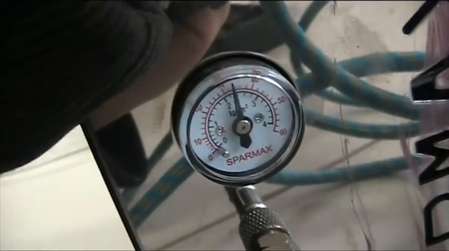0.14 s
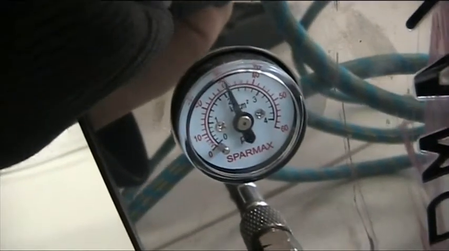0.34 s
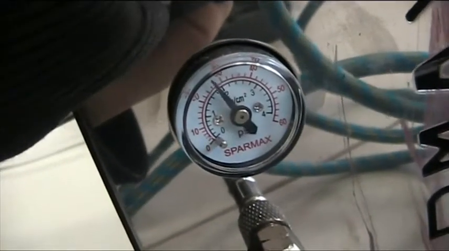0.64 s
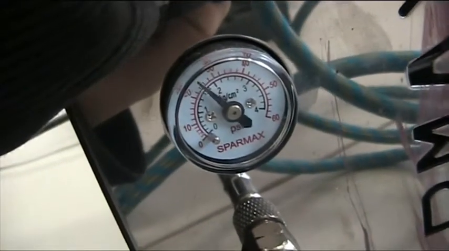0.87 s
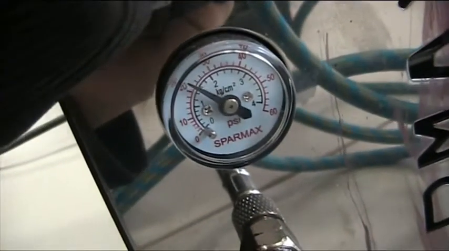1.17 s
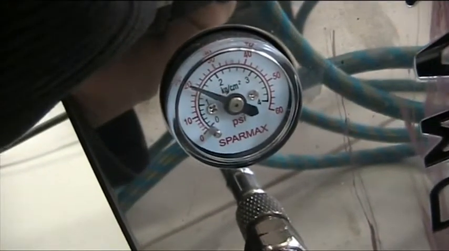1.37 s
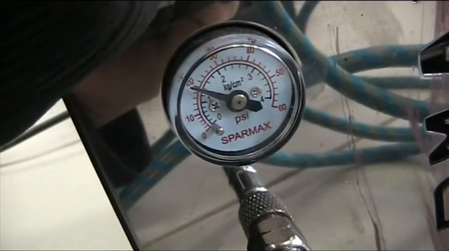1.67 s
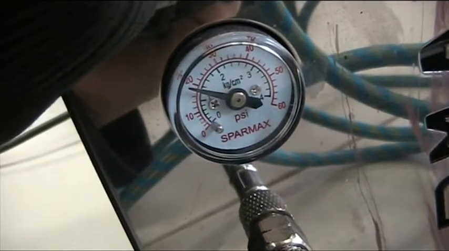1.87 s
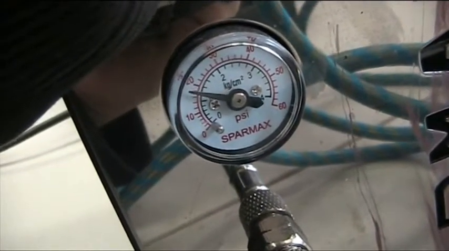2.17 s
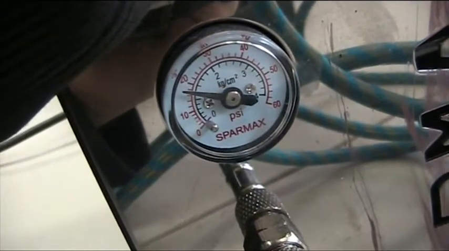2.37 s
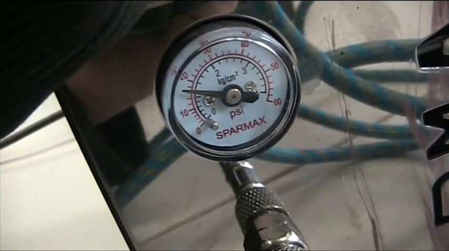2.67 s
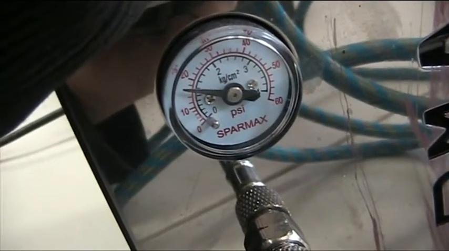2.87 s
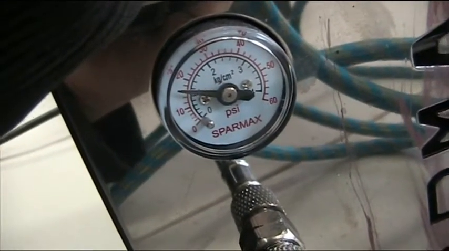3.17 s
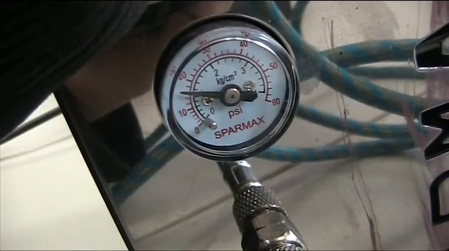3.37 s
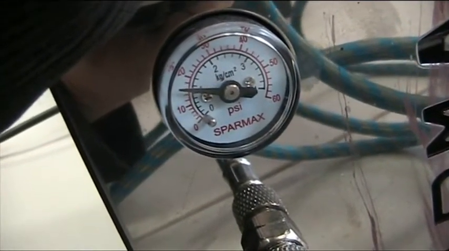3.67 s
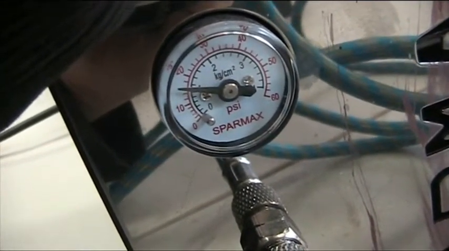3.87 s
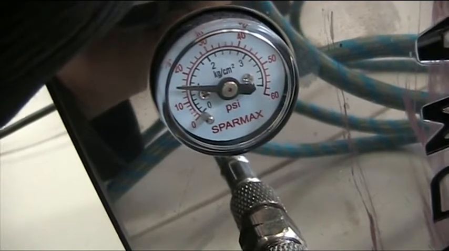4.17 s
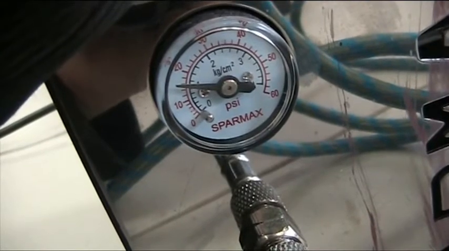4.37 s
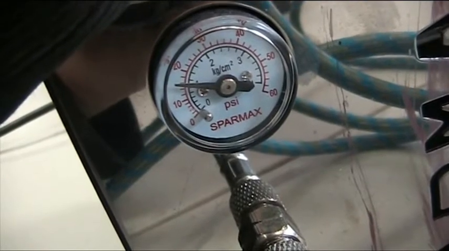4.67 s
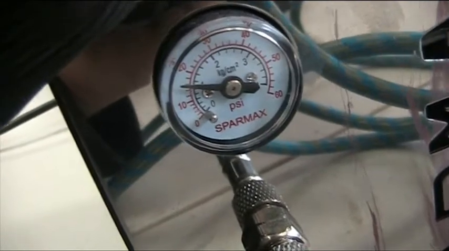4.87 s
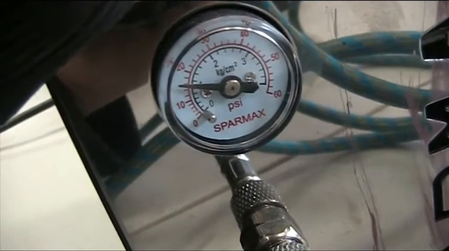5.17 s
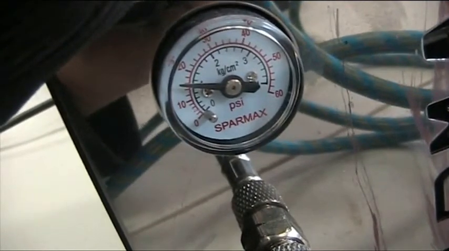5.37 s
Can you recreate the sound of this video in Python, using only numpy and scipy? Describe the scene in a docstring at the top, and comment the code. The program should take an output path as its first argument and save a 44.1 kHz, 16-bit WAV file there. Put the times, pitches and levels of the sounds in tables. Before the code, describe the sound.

A small, quiet room with a faint low hum, heard very close in stereo with hardly any echo. At about 0.04 s an air line opens: a bright, high hiss appears quickly, then fades over the next second to a weaker steady level. At 0.25 s a pressure switch snaps, a very loud, short, dry click with a crackly edge and brief metallic ring. At 0.3 s a small twin-piston compressor starts, reaching full speed by about 0.36 s. From then to the end, at 5.5 s, it runs evenly, about 47 turns a second with two strokes each, making a rough, buzzing, low throb. Electrical mains buzz beats against it, giving a fast flutter. Air rumble fills between. Valves and rods knock rapidly, ringing midrange metal parts, with dry treble ticks. The throb and knocks grow very slightly, the ticks soften, and the speed sags imperceptibly. It does not stop.

```python
"""In a small quiet room with a faint hum an air line opens: coloured noise hisses, then fades to a weaker
level. A pressure switch snaps, a decaying crackle over ringing modes, and a small twin-piston compressor starts
50 ms later. Two strokes a turn throb as shaft harmonics; mains buzz beats against them, with air rumble between
the lines. Valves and rods knock at fixed shaft angles, ringing the metal parts and ticking in the treble. Close
stereo."""
import sys
import numpy as np
from scipy import signal
from scipy.fft import rfft, irfft
from scipy.io import wavfile
from scipy.ndimage import uniform_filter1d

SR = 44100
rng = np.random.default_rng(int(sys.argv[2]) if len(sys.argv) > 2 else 0)


def store_pcm(level_fs):
    """Save levels as 16-bit WAV."""
    pcm = np.round(np.clip(level_fs, -1, 1) * 32767).astype(np.int16)
    wavfile.write(sys.argv[1], SR, np.atleast_2d(pcm).T)


N = 244299
T = np.arange(N) / SR


def undb(db):
    """Gain of a level in dB."""
    return 10 ** (np.asarray(db) / 20)


def level(x, db):
    """Scale to an rms level in dB."""
    return x * undb(db) / np.sqrt(np.mean(x ** 2))


def per_bin(table):
    """Read an (f/Hz, value) table at every frequency bin, on a log axis."""
    hz, value = np.transpose(table)
    bin_hz = np.arange(N // 2 + 1) * SR / N
    return np.interp(np.log(bin_hz + 1), np.log(hz + 1), value)


def noise(colour):
    """Gaussian noise shaped to a spectrum, rms 1."""
    spectrum = rfft(rng.standard_normal(N)) * undb(per_bin(colour))
    return level(irfft(spectrum, N), 0)


def noise_pair(colour):
    """Unrelated noise at the two ports."""
    return np.array([noise(colour), noise(colour)])


def walk(rate_hz):
    """Slow random wander, rms 1: random steps smoothed over one step."""
    step = int(SR / rate_hz)
    steps = np.repeat(rng.standard_normal(N // step + 1), step)
    return level(uniform_filter1d(steps, step)[:N], 0)


def ring(x, modes):
    """Sum of exponentially decaying modes, all set off in step."""
    out = 0
    for hz, db, t60_s in modes:
        pole = np.exp(2j * np.pi * hz / SR - np.log(1000) / (t60_s * SR))
        out = out + undb(db) * signal.lfilter([1], [1, -pole], x).imag
    return out


def radiate(force, modes):
    """A part rings in its modes and sheds little sound outside their range."""
    edges_hz = 0.94 * modes[0][0], 0.974 * max(mode[0] for mode in modes)
    band = signal.butter(2, edges_hz, "band", fs=SR, output="sos")
    return signal.sosfilt(band, ring(force, modes))


def clicks(times_s, sizes):
    """Impulses shared between two samples, for sub-sample timing."""
    at = np.clip(times_s * SR, 0, N - 2)
    i = at.astype(int)
    early = np.bincount(i, sizes * (1 - at + i), N)
    late = np.bincount(i + 1, sizes * (at - i), N)
    return early + late


# left port against right port: f/Hz, level/dB
LEFT_LEVEL = [(40, -2.5), (110, -5.5), (200, -3.5), (380, -3.5), (700, -4.5), (1290, -3.5), (2380, -3.5),
              (4400, -1), (8120, 0), (15000, 2)]
# left port against right port: f/Hz, phase lead/rad
LEFT_PHASE = [(20, 0), (3000, 0), (8500, -.4), (11000, -1.4), (16000, -2.6)]
WALLS_T60_S, WALLS_DB = 0.03, -7


def place(x):
    """Close pair of ports (left weaker in the bass, later in the treble) plus the walls' short tail."""
    half = undb(per_bin(LEFT_LEVEL) / 2) * np.exp(.5j * per_bin(LEFT_PHASE))
    direct = irfft(rfft(x) * np.array([half, 1 / half]), N)
    age_s = np.arange(int(.4 * SR)) / SR
    tail = rng.standard_normal((2, len(age_s))) * undb(-60 * age_s / WALLS_T60_S) * (age_s > .003)
    # long waves reach both ports alike
    tail = signal.lfilter(*signal.butter(1, 1500, "high", fs=SR), tail)
    tail /= np.sqrt(np.sum(tail ** 2, axis=1, keepdims=True))
    return direct + undb(WALLS_DB) * signal.fftconvolve(x[None], tail)[:, :N]


# room tone spectrum: f/Hz, relative density level/dB
ROOM_COLOUR = [(18, -34), (30, -8), (153, -0.5), (364, -6), (1010, -6), (1720, -8), (2610, -36),
               (2980, -20), (16000, -40)]
ROOM_SHARED_DB, HUM_HZ, HUM_PEAK_DB = -45, 118, -47  # hum: mean level, wanders


def room():
    """Quiet shaped noise, partly common to both ports, with a faint wavering hum."""
    hum = undb(HUM_PEAK_DB + 2.0 * walk(8.2)) * np.sin(2 * np.pi * HUM_HZ * T)
    tone = noise(ROOM_COLOUR) + 1.26 * noise_pair(ROOM_COLOUR)
    return hum + undb(ROOM_SHARED_DB) * tone


JET_OPEN_S, JET_RISE_S, JET_SETTLE_S = 0.041, .012, 0.35
JET_DB, JET_DROP_DB = -16.5, -10.5  # before the drop, total drop


def jet_gain():
    """Quick opening, then the hiss fades exponentially to a steady weaker level."""
    age_s = np.maximum(T - JET_OPEN_S, 0)
    opening = (1 - np.exp(-age_s / JET_RISE_S)) ** 2
    settled = 1 - np.exp(-age_s / JET_SETTLE_S)
    return opening * undb(JET_DB + JET_DROP_DB * settled)


# escaping air spectrum: f/Hz, relative density level/dB
JET_SPECTRUM = [(700, -28), (1700, -14), (4080, -13.5), (5590, -9.5), (6300, -12), (7090, -7.5),
                (9500, -6.5), (10800, -5.5), (11800, -4.5), (14400, -4), (15200, -3), (16000, 4.5)]


def jet():
    """Air hiss scattered off bench and walls: partly unrelated at the two ports."""
    own = noise_pair(JET_SPECTRUM)
    flicker = undb(0.3 * walk(14))
    return jet_gain() * flicker * (place(noise(JET_SPECTRUM)) + 1.17 * own)


# switch housing modes: f/Hz, relative level/dB, t60/s
SWITCH_MODES = [(490, -28, 0.033), (1120, -25, .02), (1560, -21, 0.048), (2250, -28, 0.17),
                (2640, -31, 0.054), (3350, -14, .004), (4630, -7, 0.0053), (7100, 1, 0.0077),
                (8500, -7, .006), (13100, -4, .003)]
SNAP_S, SNAP_DB = .2472, 1  # level: sqrt(2) x rms over the first 2 ms


def switch():
    """The contact blow rings the switch housing under a crackle decaying in 1.5 ms."""
    age_s = T - SNAP_S
    decay = (age_s > 0) * np.exp(-np.maximum(age_s, 0) / 0.0015)
    crackle = decay * np.diff(rng.standard_normal(N + 1))
    blow = clicks(np.array([SNAP_S]), np.ones(1))
    snap = radiate(blow, SWITCH_MODES) + undb(-7.0) * crackle
    onset = snap[(age_s > 0) & (age_s < .002)]
    return undb(SNAP_DB) * snap / np.sqrt(2 * np.mean(onset ** 2))


# current flows at MOTOR_ON_S, first full stroke SPIN_UP_S later
MOTOR_ON_S, SPIN_UP_S = .297, .06


def spin():
    """Share of the spin-up still to go: 1 at rest, 0 when running."""
    return 1 - np.clip((T - MOTOR_ON_S) / SPIN_UP_S, 0, 1)


# shaft spins up, then sags as the load grows: t/s, speed/(turns/s)
SHAFT_SPEED = [(.3, 32), (.35, 46.9), (.6, 46.7), (1, 46.677), (5.54, 46.618)]
ANGLE_ZERO_S = 1.0


def shaft_turns():
    """Shaft angle in turns, the integral of speed."""
    turns = np.cumsum(np.interp(T, *np.transpose(SHAFT_SPEED))) / SR
    return turns - turns[int(ANGLE_ZERO_S * SR)]


THROB_DB, THROB_START_DB, THROB_DB_PER_S = -22, -26, 0.33  # at t=0 extrapolated, extra at rest, growth


def throb_gain():
    """The throb swells during the spin-up and grows slowly with the load."""
    return (spin() < 1) * undb(THROB_DB + THROB_START_DB * spin() ** 2 + THROB_DB_PER_S * T)


# steady throb before tilt: multiple of shaft speed, relative level/dB
THROB_LINES = [(1, 2), (2, -7.5), (3, 1), (4, 1.5), (5, -4.5), (6, 1), (7, -2), (8, 0), (9, 3), (10, 0),
               (11, 3.5), (12, -21), (13, -3.5), (14, -8), (15, -11.5), (18, -9.5), (19, -14), (20, -7),
               (21, -19)]
# two piston strokes and a weak rebound: angle/turns, relative size, phase lead/rad
PISTON_STROKES = [(.315, 1.0, 1.5), (.84, .95, .3), (.51, .3, 0)]
# magnetic buzz and side lines: multiple of mains, multiple of shaft speed, relative level/dB
BUZZ_LINES = [(2, 0, 0), (2, 1, -4.5), (4, 1, -17.5), (2, 3, -12.5), (2, 4, -18), (2, 8, -14.5),
              (2, 9, -27)]
MAINS_HZ, MAINS_ZERO_S, PULL_TURNS = 49.972, .0007, .37  # buzz lines align at PULL_TURNS
TILT_DB_PER_OCT, TILT_START_DB_PER_OCT = -0.43, -5.5  # running, extra at rest


def throb(turns):
    """Shaft harmonics phased as strokes, duller until pressure builds, plus motor buzz."""
    out = 0
    tilt_db = TILT_DB_PER_OCT + TILT_START_DB_PER_OCT * spin()
    for k, db in THROB_LINES:
        stroke = sum(size * np.exp(1j * (lead - 2 * np.pi * k * angle))
                     for angle, size, lead in PISTON_STROKES)
        line_db = db + tilt_db * np.log2(k / 3) + 0.52 * walk(6)
        out = out + undb(line_db) * np.cos(2 * np.pi * k * turns + np.angle(stroke))
    for m, k, db in BUZZ_LINES:
        cycles = m * MAINS_HZ * (T - MAINS_ZERO_S) + k * (turns - PULL_TURNS)
        out = out + undb(db) * np.cos(2 * np.pi * cycles)
    return level(out, 0)


# air rumble spectrum: f/Hz, relative density level/dB
RUMBLE_COLOUR = [(18, -30), (30, -10), (70, -0.5), (130, 2), (330, 3), (520, 4.5), (640, -0.5), (770, -4.5),
                 (950, -2.5), (1300, 2), (2000, 0.5), (3500, -4), (5000, -12)]


def rumble():
    """Air noise between the throb lines, from all round the machine."""
    air = place(noise(RUMBLE_COLOUR)) + 0.6 * noise_pair(RUMBLE_COLOUR)
    return throb_gain() * undb(-5.0) * air


# at t=0 extrapolated, extra before the first full stroke, growth
KNOCK_DB, KNOCK_SLACK_DB, KNOCK_DB_PER_S = -21.5, -18, 0.28
TICK_DB, TICK_SLACK_DB, TICK_DB_PER_S = -25, -24, -0.78


def knock_gain(db, slack_db, db_per_s):
    """Faint while the motor gathers speed, full from the first loaded stroke."""
    return (1 - spin()) * undb(db + slack_db * (spin() > 0) + db_per_s * T)


# ringing metal parts, modes: f/Hz, relative level/dB, t60/s
CASE_MODES = [(1036, -14.5, 0.11), (1074.6, -6.5, 0.085), (1164.6, 5.5, 0.085), (1207, -8.5, 0.043),
              (1308, -0.5, 0.099)]
HEAD_MODES = [(1397, -1.5, 0.073), (1447, -3.5, 0.12), (1549, 0, 0.088), (1675.5, 1, 0.067),
              (1704, -2, .05), (1800, -7, 0.055), (1615, 8, 0.016)]
PLATE_MODES = [(2154, -1, 0.076), (2227, -0.5, 0.1), (2275, -3, 0.047)]
COVER_MODES = [(2586, 1.5, 0.054), (2706, -4, .03), (3085, -9.5, 0.039), (3280, -10.5, 0.054),
               (4315, -14.5, 0.07), (5065, -15, 0.053), (6630, -15, .02), (7630, -18, 0.026),
               (8400, -20, .025), (9430, -13, .02)]
# knocks in each turn: angle/turns, relative case, head, plate, cover, tick level/dB,
# timing scatter/ms, size scatter/dB (both before the looseness factor)
KNOCKS_PER_TURN = [(.95, 0, -2, -1.5, -14, -2, 0.043, 1.5), (.04, -19, -13, -6.5, -4, 0.5, .07, 2.0),
                   (.17, -8, -5.5, -11, -15, -2.5, .08, 2.5), (.2833, -11.5, 0, -7, 0.5, -12, .1, 2.5),
                   (.40, -16.5, -17, -13, -11, -11.5, .15, 3.0), (.53, -9, -10.5, -8, -10, -15, 0.17, 2.5),
                   (.81, -21, -14, -18, -14, -10.5, 0.09, 3.0)]
# scatter factor of case, head, plate, cover, tick [ratio]
LOOSENESS = [.5, 1.4, .7, .9, 1.0]
# treble burst spectrum: f/Hz, relative density level/dB
TICK_COLOUR = [(1650, -46), (2800, 0.5), (2920, -4), (3190, -7.5), (4100, -6.5), (4990, -6.5), (6950, -8.5),
               (7410, -7), (9680, -8), (10600, -15.5), (11600, -6.5), (15700, -17)]


def knocks(turns, beat_ms=.03, beat_db=-1.2):
    """Each knock rings four parts and bursts in the treble; the slip beat shifts and weights them."""
    whole = np.arange(np.floor(turns[0]) + 1, turns[-1] - 1)
    force = np.zeros((5, N))
    for angle, *part_db, scatter_ms, scatter_db in KNOCKS_PER_TURN:
        knock_s = np.interp(whole + angle, turns, T)
        # magnetic pull at the moment of the knock
        torque = np.sin(4 * np.pi * MAINS_HZ * (knock_s - MAINS_ZERO_S))
        chance = rng.standard_normal((len(knock_s), 11)).T
        for p in range(5):
            jitter_ms = LOOSENESS[p] * scatter_ms * (chance[0] + .6 * chance[6 + p])
            when_s = knock_s + (beat_ms * torque + jitter_ms) / 1000
            size_db = part_db[p] + beat_db * torque + LOOSENESS[p] * scatter_db * chance[1 + p]
            force[p] += clicks(when_s, undb(size_db))

    def fade(x, tau_s):
        """Exponential decay after each impulse."""
        return signal.lfilter([1], [1, -np.exp(-1 / (tau_s * SR))], x)

    # loose parts chatter on after each knock
    force[:4] += undb(-30.5) * fade(force[:4], 0.0028) * rng.standard_normal((4, N))
    parts = (CASE_MODES, HEAD_MODES, PLATE_MODES, COVER_MODES)
    parts_db = (-6.0, -3.5, -6.5, -5.0)
    metal = sum(level(radiate(f, part), db) for f, part, db in zip(force, parts, parts_db))
    burst = level(fade(force[4], .0005) + 0.51 * fade(force[4], .005), 0)
    # shared treble, then each port's own: it reaches them partly by different paths
    air = np.array([noise(TICK_COLOUR), 0.45 * noise(TICK_COLOUR), 0.86 * noise(TICK_COLOUR)])
    return level(metal, 0), burst * air


def scene():
    """Compressor and switch from one spot, air jet and room around them."""
    turns = shaft_turns()
    metal, ticks = knocks(turns)
    metal = knock_gain(KNOCK_DB, KNOCK_SLACK_DB, KNOCK_DB_PER_S) * metal
    ticks = knock_gain(TICK_DB, TICK_SLACK_DB, TICK_DB_PER_S) * ticks
    pump = throb_gain() * throb(turns) + metal + ticks[0]
    return room() + jet() + place(switch() + pump) + rumble() + ticks[1:]


TOP_HZ = 15730


def record(dry):
    """The stereo pickup blocks steady offset, rounds the loudest peaks and cuts the top."""
    dry = signal.lfilter(*signal.butter(1, 12, "high", fs=SR), dry)
    rounded = np.tanh(0.81 * dry) / 0.81
    return signal.sosfilt(signal.ellip(16, .3, 70, TOP_HZ, fs=SR, output="sos"), rounded)


dry = scene()
out = record(dry)
store_pcm(out)
```